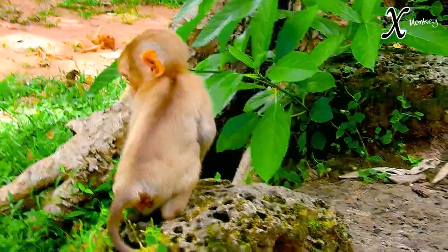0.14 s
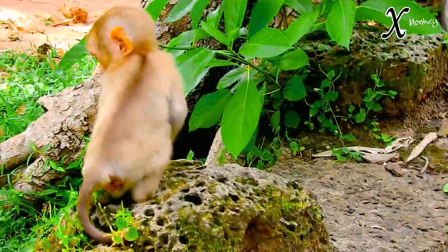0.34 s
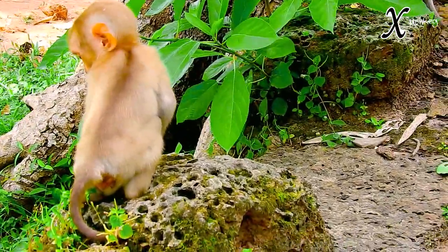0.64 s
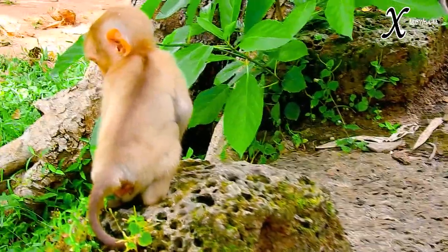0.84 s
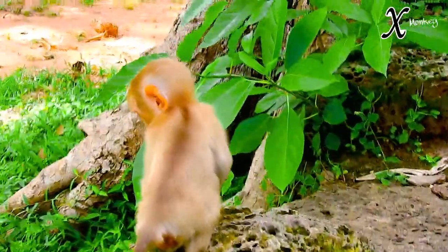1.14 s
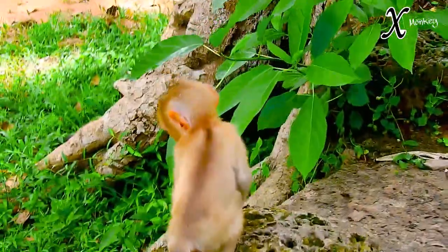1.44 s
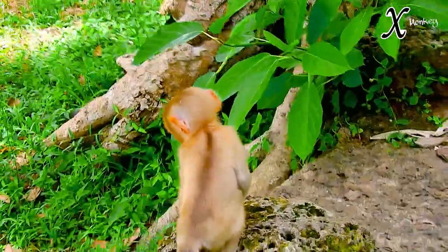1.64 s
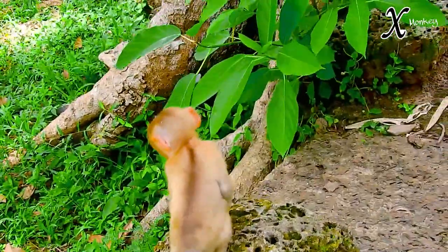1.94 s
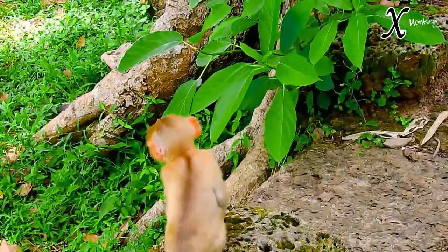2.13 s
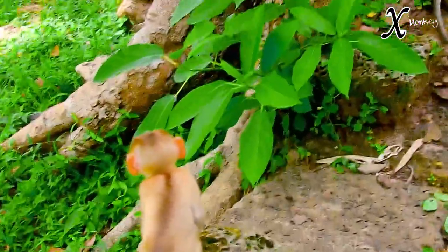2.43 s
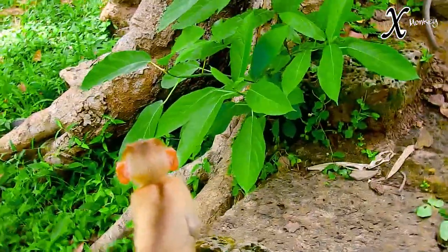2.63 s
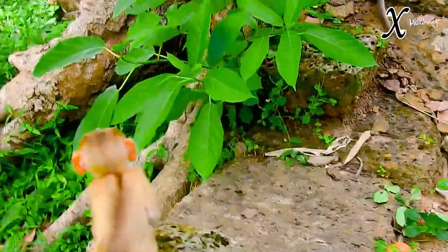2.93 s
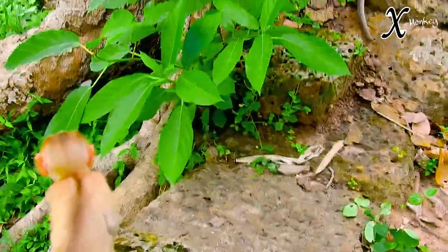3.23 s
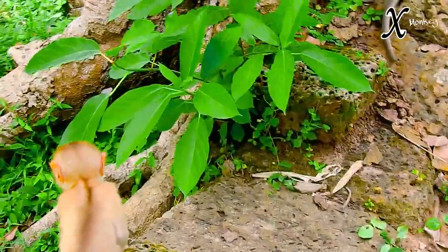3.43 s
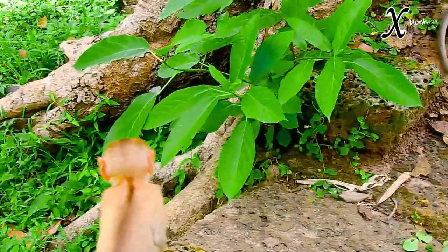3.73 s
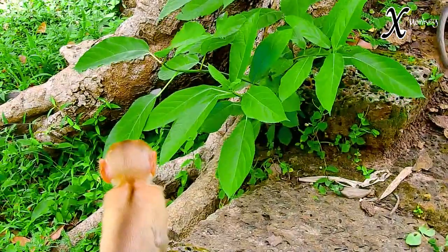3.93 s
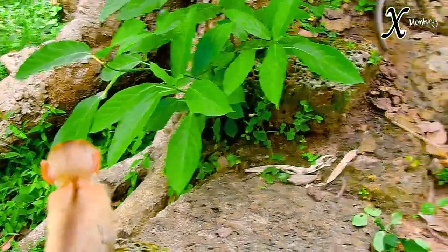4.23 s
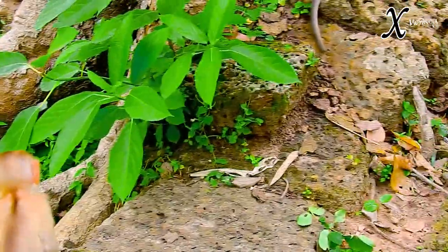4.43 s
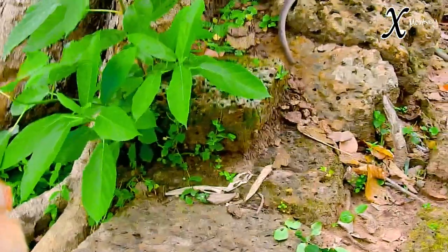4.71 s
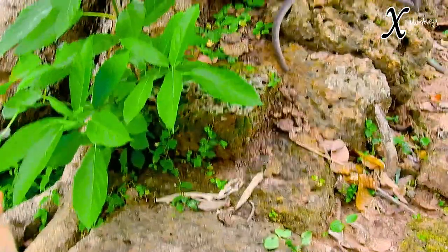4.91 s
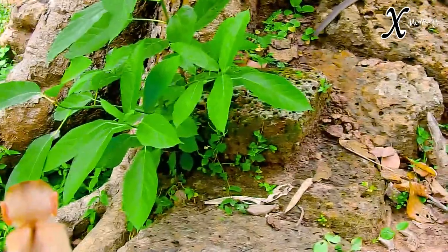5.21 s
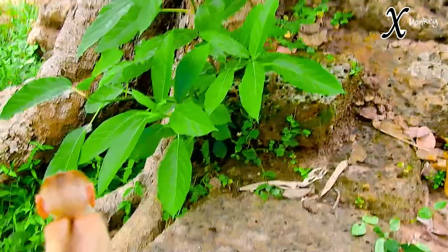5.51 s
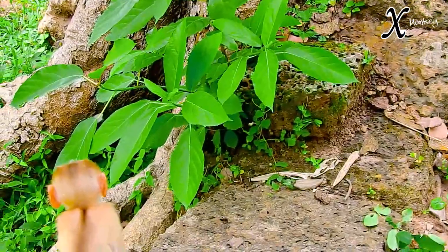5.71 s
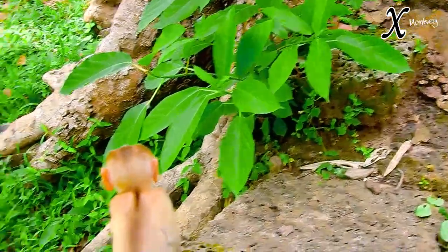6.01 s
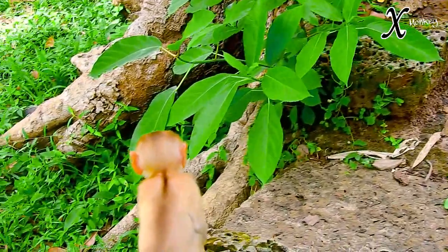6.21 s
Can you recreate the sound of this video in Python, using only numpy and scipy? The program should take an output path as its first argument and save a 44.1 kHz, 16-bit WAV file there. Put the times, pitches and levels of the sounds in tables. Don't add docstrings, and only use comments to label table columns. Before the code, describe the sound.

Close to a small stereo camera microphone in a wood, a young monkey calls three times: quick clear pips breaking into a rough screech that drops in pitch and echoes briefly. Low wind bumps, small knocks and twig ticks fall between calls over soft insect hiss. Afterwards a slow engine rises from the distance, puffing low exhaust and tyre hiss, leaning left.

```python
import sys
import numpy as np
from scipy import signal
from scipy.fft import rfft, irfft, next_fast_len
from scipy.io import wavfile
from scipy.ndimage import uniform_filter1d

SR = 44100
rng = np.random.default_rng(int(sys.argv[2]) if len(sys.argv) > 2 else 0)


def gain_from_db(level_db):
    decades = np.asarray(level_db, float) / 20
    return 10 ** decades


def transcribe(u):
    v = np.clip(np.atleast_2d(u).T, -1, 1)
    q = np.round(v * 32767).astype(np.int16)
    wavfile.write(sys.argv[1], SR, q)


N = 280387
HOP = 256

# frequency in Hz, left minus right in dB.
ROAD_SIDE = [(60, 2.5), (170, 3.5), (500, 4.0), (1430, 6.0), (4130, 2.0), (11900, 3.0)]


def evened(x):
    return x / np.sqrt(np.mean(x ** 2) + 1e-20)


def read(points, hz):
    f, value = np.transpose(points)
    return np.interp(np.log(hz + 1), np.log(f + 1), value)


def add(mix, s, sound):
    part = mix[..., round(s * SR):][..., :sound.shape[-1]]
    part += sound[..., :part.shape[-1]]


def colour(x, points):
    size = next_fast_len(x.shape[-1] + 512)
    gain = gain_from_db(read(points, np.fft.rfftfreq(size, 1 / SR)))
    return irfft(rfft(x, size) * gain, size)[..., :x.shape[-1]]


def wander(count, width_hz):
    keep = np.exp(-2 * np.pi * width_hz / SR)
    noise = rng.standard_normal(count + 2000)
    return evened(signal.lfilter([1], [1, -2 * keep, keep ** 2], noise)[2000:])


def drift(width_hz):
    count = N // HOP + 2
    return np.interp(np.arange(N) / HOP, np.arange(count), wander(count, width_hz * HOP))


def placed(x, side_db):
    return x * gain_from_db(np.array([[.5], [-.5]]) * side_db)


def field(spectrum, side, patchy_db):
    # frequency in Hz, left-right likeness from 0 to 1.
    likeness = [(40, .3), (100, .5), (200, .85), (300, .92), (2000, .94), (5000, .75), (10000, .55)]
    # frequency in Hz, phase by which the left port leads in radians.
    lead = [(500, 0), (2000, .2), (3700, .45), (5800, 1.3), (6500, 2), (10000, 3.2)]
    hz = np.fft.rfftfreq(4 * HOP, 1 / SR)
    a, b, c, d, patches = rng.standard_normal((N // HOP + 5, len(hz), 5)).T
    patches = uniform_filter1d(patches, size=14, axis=0)
    patches = evened(uniform_filter1d(patches, size=12, axis=1))
    same = np.clip(read(likeness, hz), 0, 1)[:, None]
    left = a + 1j * b
    shared = same * left * np.exp(-1j * read(lead, hz))[:, None]
    right = shared + np.sqrt(1 - same ** 2) * (c + 1j * d)
    tilt = gain_from_db(read(side, hz) / 2)[:, None]
    level = gain_from_db(read(spectrum, hz)[:, None] + patchy_db * patches)
    z = np.array([left * tilt, right / tilt]) * level
    x = signal.istft(z, nperseg=4 * HOP, noverlap=3 * HOP)[1][:, :N]
    return x / np.sqrt(np.mean(x.mean(0) ** 2))


def air():
    # frequency in Hz, level in dB per Hz.
    air_spectrum = [(18, -61), (30, -30), (54, -37), (71, 3.5), (162, 0.5), (193, -8.5), (312, -18.5),
                    (491, -21.5), (681, -23), (1100, -25), (1870, -30), (3780, -33.5), (4070, -32),
                    (6410, -27), (12300, -50.5), (16000, -90.5), (22000, -120)]
    # frequency in Hz, left minus right in dB.
    air_side = [(60, 4.5), (230, 4.5), (840, 2.5), (3170, 1.5), (11900, 1.5)]
    return gain_from_db(-40.5) * field(air_spectrum, air_side, patchy_db=1.0)


def wind_bumps():
    # start in seconds, peak in dB, pitch in Hz, length in seconds, left minus right in dB.
    bumps = [(0.1, -33, 96, 0.063, 2), (0.135, -27, 82, 0.051, 4.5), (0.306, -20, 93.6, 0.037, 10),
             (0.332, -20.5, 73, 0.04, -3), (0.368, -22, 80.4, 0.082, 4), (1.348, -20.5, 83.6, 0.041, -6),
             (1.535, -29, 154, 0.025, 15), (1.589, -25.5, 109.3, 0.059, 13), (1.621, -19, 104.4, 0.077, 1),
             (1.666, -23.5, 186.5, 0.057, 4.5), (1.693, -20.5, 81.5, 0.053, -2),
             (1.749, -22.5, 79.7, 0.054, 10), (1.805, -36, 70.4, 0.054, 13),
             (3.999, -26.5, 116.4, 0.076, 2.0), (6.253, -27.5, 114, 0.076, -2)]
    out = np.zeros((2, N))
    slips = np.cos(np.pi * rng.random(len(bumps)))
    for (s, db, hz, length, side_db), slip in zip(bumps, slips):
        t = np.arange(0, length, 1 / SR)
        apart = .7 * slip * np.array([[1], [-1]])
        swing = np.sin(2 * np.pi * hz * t + apart) / np.cos(.7 * slip)
        gust = np.sin(np.pi * (t / length) ** 0.44)
        add(out, s, placed(gain_from_db(db) * swing * gust, side_db))
    return out


def knocks():
    # start in seconds, peak in dB, pitch in Hz, t60 in seconds, left minus right in dB.
    knock_rows = [
        (.302, -25, 146, 0.19, 13),
        (.303, -38.5, 326, 0.1, 10),
        (2.768, -24, 231, 0.22, 5.5),
        (2.785, -34.5, 1130, 0.047, 5),
        (2.786, -30, 830, 0.087, 3),
        (4.584, -16.5, 271, 0.048, 11),
        (4.586, -32.5, 552, 0.048, -1),
        (5.1, -31, 660, .03, 1),
        (4.589, -35.5, 1100, 0.058, 3),
    ]
    out = np.zeros((2, N))
    for s, db, hz, t60, side_db in knock_rows:
        t = np.arange(0, t60, 1 / SR)
        ring = gain_from_db(db - 60 * t / t60) * np.sin(2 * np.pi * hz * t)
        add(out, s, placed(ring * (1 - np.exp(-t / 0.0016)), side_db))
    return out


def twigs():
    # start in seconds, low part in dB, treble part in dB, length in seconds.
    ticks = [
        (0.361, -55, -49.5, 0.072),
        (1.575, -51, -43.5, 0.05),
        (2.287, -41.5, -36.5, 0.053),
        (2.372, -48, -11.5, 0.0036),
        (2.383, -46, -55, 0.033),
        (2.771, -33, -39, 0.0016),
        (2.787, -46, -43, 0.0045),
        (2.982, -45.5, -55.5, 0.014),
        (3.155, -39, -49, 0.0025),
    ]
    out = np.zeros(N)
    for s, low_db, high_db, length in ticks:
        t = np.arange(0, 2 * length, 1 / SR)
        burst = (t / length * np.exp(1 - 2.94 * t / length)) ** 0.5
        grit = rng.standard_normal(len(t)) * burst * (1 + 0.19 * wander(len(t), width_hz=120))
        dull = colour(grit, [(500, -48), (1000, 2), (2500, -8), (4000, -5.0), (4600, -40)])
        bright = colour(grit, [(3800, -23.0), (5000, -9), (6500, -1.0), (8500, -15), (11000, -24.5), (14000, -31)])
        add(out, s, 4 * gain_from_db(low_db) * dull + 4 * gain_from_db(high_db) * bright)
    return out


def whistles():
    # start in seconds, end in seconds, start pitch in Hz, end pitch in Hz, level in dB.
    swishes = [
        (.42, .53, 1754, 1714, -52),
        (2.14, 2.36, 6600, 6480, -47),
        (3.15, 3.2, 3510, 3400, -48.5),
        (5.55, 6.1, 2592, 1497, -49),
    ]
    # start in seconds, end in seconds, start pitch in Hz, end pitch in Hz, level in dB.
    tones = [
        (.74, 1.2, 3340, 3380, -66),
        (.76, 1.33, 3830, 3870, -67),
        (1.2, 1.7, 1158, 1177, -65),
        (1.55, 1.68, 587, 575, -56),
        (3.35, 4.6, 349, 370.4, -53.5),
        (4.85, 5.4, 526, 551.5, -48),
        (5.2, 5.75, 280, 290.6, -42.5),
    ]
    out = np.zeros(N)
    for rows, share, steady in ((tones, .018, 0.58), (swishes, 0.21, .2)):
        for s0, s1, hz0, hz1, db in rows:
            count = round((s1 - s0) * SR)
            carrier = np.exp(2j * np.pi * np.cumsum(np.linspace(hz0, hz1, count)) / SR)
            width_hz = share * hz0 / 2
            fuzz = steady + wander(count, width_hz) + 1j * wander(count, width_hz)
            add(out, s0, gain_from_db(db) * (fuzz * carrier).real * signal.windows.tukey(count, .4))
    return placed(out, side_db=7.0)


def voice(hz, low_db, high_db, rough):
    # frequency in Hz, level in dB.
    tight_throat = [(2240, -40.5), (3800, -34), (4580, -44), (4910, -13), (5360, -3.5), (6250, -7.5),
                    (6530, -10.5), (7950, -6), (9730, -33), (12300, -26), (16000, -91), (22000, -120)]
    # frequency in Hz, level in dB.
    open_throat = [(1530, -31), (2600, -20), (3140, -11.5), (3970, -10.5), (4490, 0.5), (5460, -2.5),
                   (6640, 2), (7920, -9), (10000, -18), (11800, -29), (12300, -59), (16000, -75),
                   (22000, -120)]
    count, rough = len(hz), np.clip(rough, 0, 1)
    jittered_hz = hz * (1 + 0.039 * rough * wander(count, width_hz=335))
    turn = np.exp(2j * np.pi * np.cumsum(jittered_hz) / SR)
    flutter_hz = 290 * (1 + .35 * wander(count, width_hz=120))
    flutter = 1 + .6 * np.cos(2 * np.pi * np.cumsum(flutter_hz) / SR)
    partials = []
    for k in range(1, 11):
        wobble = wander(count, width_hz=99) + 1j * wander(count, width_hz=94)
        fuzz = (1 - rough) * 1.56 + 0.93 * rough * wobble
        partials.append((fuzz * turn ** k).real * (k * hz < 13000))
    opening = np.clip((3350 - hz) / 600, 0, 1)
    strands = (.9 - .55 * opening) * evened(sum(partials[1:]) * np.sqrt(hz))
    breath = np.maximum(rough ** 2, .8 * opening) * rng.standard_normal(count)
    drive = flutter * (strands + breath)
    tight = evened(colour(drive, tight_throat))
    wide = evened(colour(drive, open_throat))
    low = partials[0] + 0.3 * opening * partials[1]
    return gain_from_db(low_db) * low + gain_from_db(high_db) * ((1 - opening) * tight + opening * wide)


def screech(start, drop, high_db, low_db, ring_db):
    # resonance in Hz, width in octaves, share of the chest ring.
    chest = [
        (2434, 0.11, 0.24),
        (1564, 0.18, 0.91),
        (1094, 0.19, 0.4),
    ]
    hold_hz, end_hz, drop_s = 3255, 1020.5, .0135
    swell_s, swell_db, attack_s = .02, 11, 0.0031
    t = np.arange(start - swell_s, drop + .1, 1 / SR)
    hz = end_hz + (hold_hz - end_hz) / (1 + np.exp((t - drop) / drop_s))
    ring = ring_db * sum(share * np.exp(-(np.log2(hz / f) / octaves) ** 2) for f, octaves, share in chest)
    early = np.maximum(start - t, 0)
    released = np.maximum(t - drop - 0.012, 0)
    high = high_db - 41 * (t - start) - swell_db * early / swell_s - 435 * released
    low = low_db + ring - 269 * (t - start) - 20 * early / attack_s
    sound = voice(hz, low, high, 0.824 - .024 * ring)
    return start - swell_s, sound * signal.windows.tukey(len(t), .08)


def monkey():
    # start in seconds, length in seconds, pitch in Hz, overtone peak in dB, fundamental peak in dB.
    pips = [
        (0.544, 0.03, 2750, -35.5, -48),
        (0.577, 0.023, 3224, -8, -20.5),
        (0.606, .025, 3300, -7.5, -4.5),
        (1.894, 0.033, 2760, -35.5, -54),
        (1.916, 0.013, 2970, -18, -56),
        (1.953, 0.045, 3393, -3, -8),
        (3.454, 0.018, 2710, -27, -62),
        (3.485, 0.018, 3096, -6.5, -22.5),
        (3.517, .023, 3100, -4.5, -8.5),
    ]
    # start in seconds, middle of the pitch drop in seconds, then overtones, fundamental
    # and chest ring in dB.
    screeches = [
        (.636, .686, -14, -25, 16),
        (2.006, 2.058, -12.5, -20, 11),
        (3.549, 3.602, -12, -19, 19),
    ]
    out = np.zeros(N)
    for s, length, hz, high_db, low_db in pips:
        t = np.arange(0, length, 1 / SR)
        shape = signal.windows.tukey(len(t), .35) * np.exp(-.7 * t / length)
        rough = 0.49 + 0.07 * (-8.5 - high_db)
        add(out, s, shape * voice(hz + 0 * t, low_db - 9.5, high_db - 7, rough))
    for row in screeches:
        add(out, *screech(*row))
    return out


def wood(x):
    # frequency in Hz, t60 in seconds.
    decay = [(1000, 0.11), (3000, 0.33), (5200, 0.45), (6500, 0.41), (9000, 0.33), (12000, 0.1)]
    taps = np.zeros((2, SR))
    at = np.arange(200, SR - 20, 20) + rng.integers(0, 20, (2, (SR - 201) // 20))
    np.put_along_axis(taps, at, rng.choice([-1., 1.], at.shape), 1)
    hz, t, z = signal.stft(taps, SR, nperseg=HOP)
    dying = gain_from_db(-60 * t / read(decay, hz)[:, None])
    tail = signal.istft(z * dying, SR, nperseg=HOP)[1]
    return signal.fftconvolve(x[None], tail / np.linalg.norm(tail[0]), axes=1)[:, :N]


def exhaust(turns, puff):
    # multiple of the firing rate, level in dB.
    order_rows = [(1, -14), (2, 3.5), (3, 4.5), (4, 4.5), (5, -1.5), (6, 3.5), (7, -11), (8, -12),
                  (9, -13.5), (10, -2), (11, -9.5), (12, -8.5), (13, -20), (14, -15), (15, -32), (16, -14),
                  (17, -17.5), (18, -9), (19, -22), (20, -12.5), (21, -12), (22, -15), (23, -51), (24, -34),
                  (25, -33), (26, -14)]
    # frequency in Hz, level in dB.
    roar = [(24, -36), (40, -15), (54, -4), (172, 0), (222, -7.5), (292, -6.5), (651, -15.5), (770, -17),
            (1500, -33), (1950, -46), (3300, -120)]
    orders = np.zeros(N)
    for k, db in order_rows:
        phase = 2 * np.pi * (k * turns + 0.12 * rng.standard_normal())
        orders += gain_from_db(db) * (1 + 0.39 * drift(width_hz=1.9)) * np.cos(phase)
    rough = gain_from_db(2.5) * (0.42 + puff) * field(roar, ROAD_SIDE, patchy_db=1.9)
    return gain_from_db(4.0) * placed(evened(orders), side_db=3.0) + rough


def tyres_and_fan(nearer_db):
    # frequency in Hz, level in dB.
    hiss = [(410, -48), (700, 3.5), (764, -18.5), (897, 2.5), (1070, -7.5), (1180, -3.5), (4000, -14),
            (5200, -27), (8800, -120)]
    # frequency in Hz, level in dB.
    fizz = [(2060, -17), (3500, -9.5), (5360, -5.5), (6020, -1.5), (6800, -0.5), (10300, -23.5),
            (11300, -28.5), (11800, -42), (12300, -43), (16000, -71), (22000, -120)]
    tyres = gain_from_db(-56 + 1.106 * nearer_db) * field(hiss, ROAD_SIDE, patchy_db=2.5)
    return tyres + gain_from_db(-53.5 + 0.9 * nearer_db) * field(fizz, ROAD_SIDE, patchy_db=1.0)


def engine():
    # time in seconds, nearness in dB.
    nearness = [
        (3.95, -47),
        (4.3, -47),
        (4.73, -42.5),
        (5.2, -40.5),
        (5.75, -35),
        (6.05, -37),
        (6.36, -36.5),
    ]
    # time in seconds, firings per second.
    firing = [
        (2.9, 30),
        (4.5, 31),
        (5.1, 31.8),
        (5.35, 32.1),
        (5.7, 31.8),
        (6.36, 32.2),
    ]
    t = np.arange(N) / SR
    nearer_db = np.interp(t, *np.transpose(nearness)) + 47
    firing_hz = np.interp(t, *np.transpose(firing)) * (1 + 0.0042 * drift(width_hz=4.88))
    turns = np.cumsum(firing_hz) / SR
    puff = uniform_filter1d(np.exp(-(turns % 1) / 0.32), size=120)
    pipe = gain_from_db(-45.5 + 0.8 * nearer_db) * exhaust(turns, puff)
    arrival = np.clip((t - 2.3) / 1.28, 0, 1)
    return arrival * (pipe + (0.89 + 0.18 * puff) * tyres_and_fan(nearer_db))


def scene():
    call, ticks = monkey(), twigs()
    close = call + ticks
    ports = np.array([close, np.roll(close, 1)]) * gain_from_db(np.array([[1.2], [-1.2]]))
    echoes = gain_from_db(-8.5) * wood(call + 0.33 * ticks)
    return ports + echoes + air() + engine() + whistles() + wind_bumps() + knocks()


def band_limit(x):
    return signal.sosfilt(signal.butter(12, 15030, fs=SR, output="sos"), x)


def record(dry):
    # frequency in Hz, level in dB.
    microphone = [(20, -21), (45, -2), (70, -1), (9000, 0.5), (12400, -5), (12900, -26.5)]
    # frequency in Hz, level in dB.
    self_noise = [(9000, -39), (10500, 8), (15000, -2)]
    late_s, split_hz = 0.0095, 4270
    low = signal.oaconvolve(dry, signal.firwin(255, split_hz, fs=SR)[None], "same")
    late = low + np.roll(dry - low, round(late_s * SR), axis=1)
    soft = colour(.82 * np.tanh(late / .82), microphone)
    hz, t, z = signal.stft(soft, SR, nperseg=4 * HOP)
    hz, line_db = hz[:, None], 20 * np.log10(abs(z) + 1e-9)
    band_power = uniform_filter1d((abs(z) ** 2).mean(0), size=7, axis=0)
    band_db = 10 * np.log10(band_power + 1e-16)
    loud_db = np.where(hz > 4500, band_db, -200).max(0)
    limit_db = loud_db - 37.0 + 3.84 * np.log2(2500 / (hz + 1))
    mid = np.clip((hz - 300) / 250, 0, 1) * (hz < 2500)
    starved = mid * np.clip((limit_db - band_db) / 3, 0, 1)
    faint = np.clip((hz - 8500) / 900, 0, 1) * (line_db < np.maximum(loud_db - 36, -87))
    kept = signal.istft(z * gain_from_db(-35 * starved - 32 * faint), SR, nperseg=4 * HOP)[1][:, :N]
    mix = kept + gain_from_db(-79) * colour(rng.standard_normal(kept.shape), self_noise)
    return band_limit(mix)


dry = scene()
out = record(dry)
transcribe(out)
```